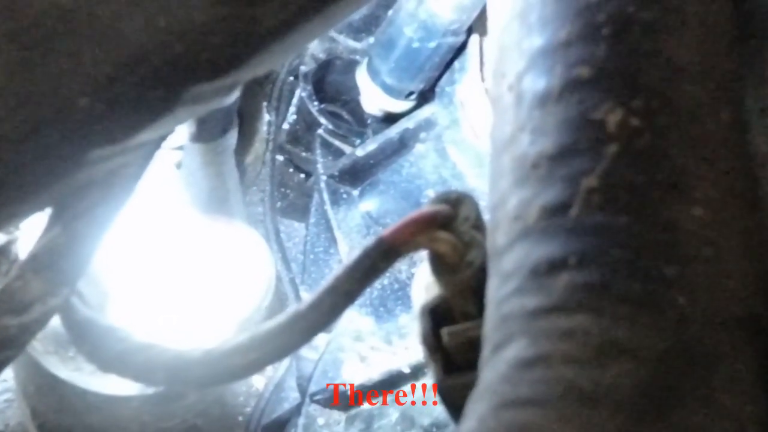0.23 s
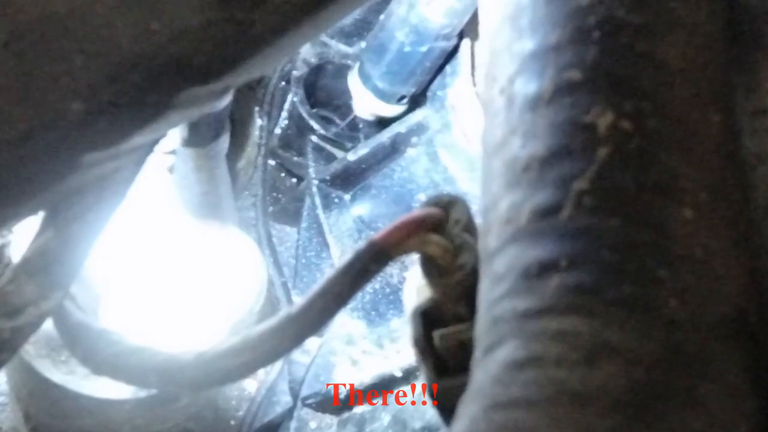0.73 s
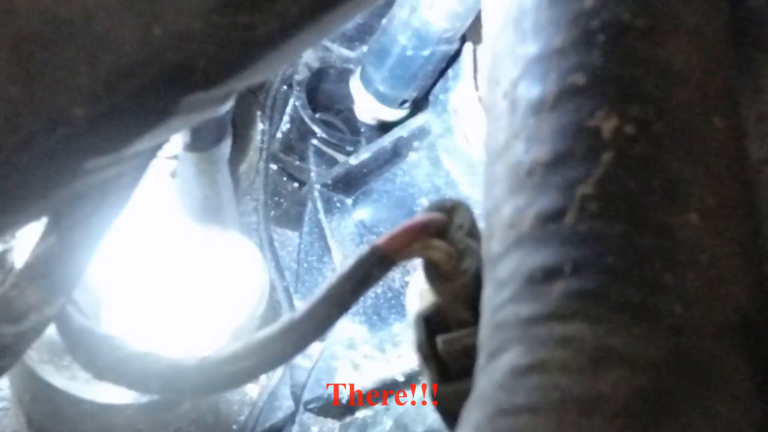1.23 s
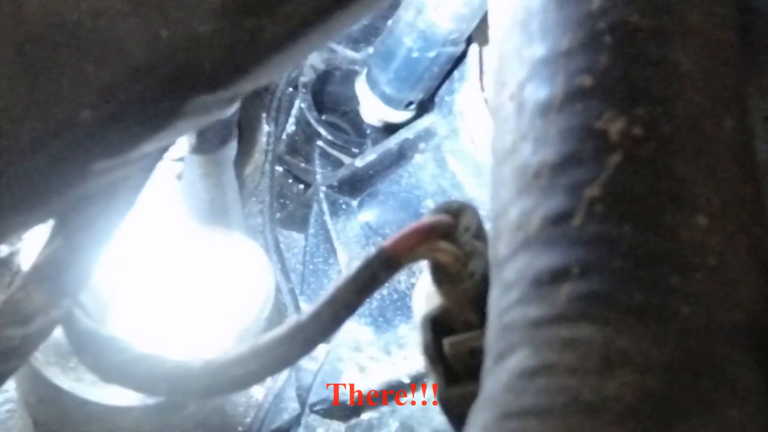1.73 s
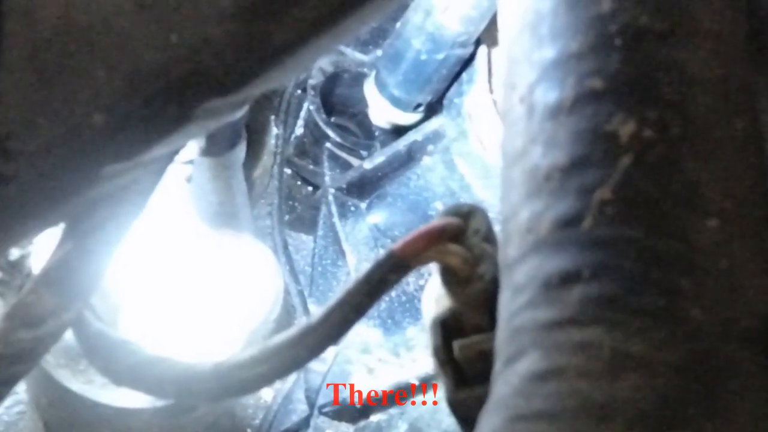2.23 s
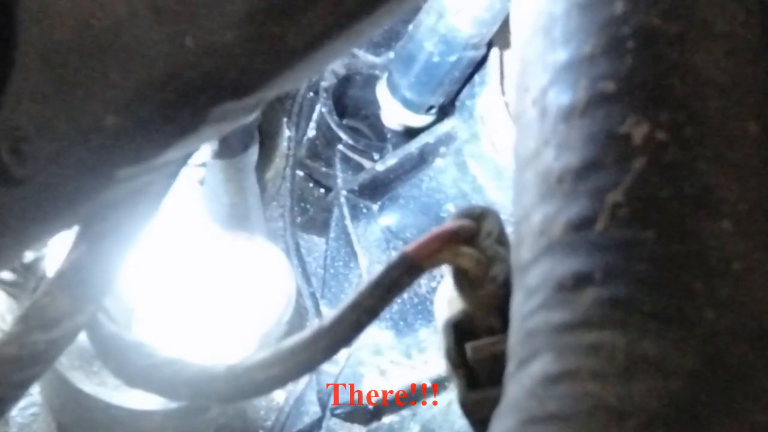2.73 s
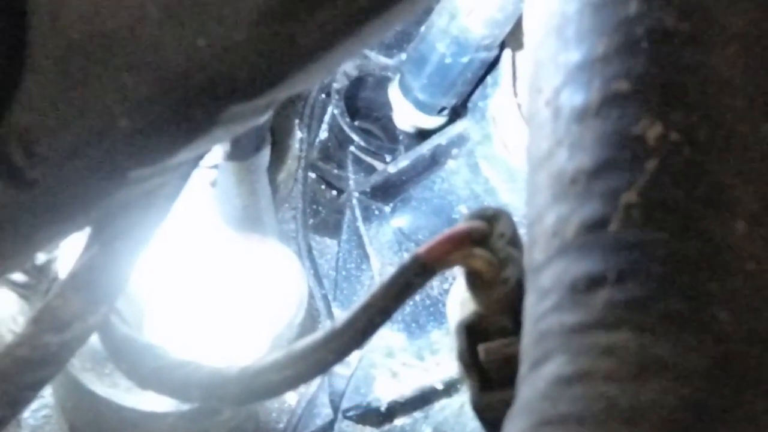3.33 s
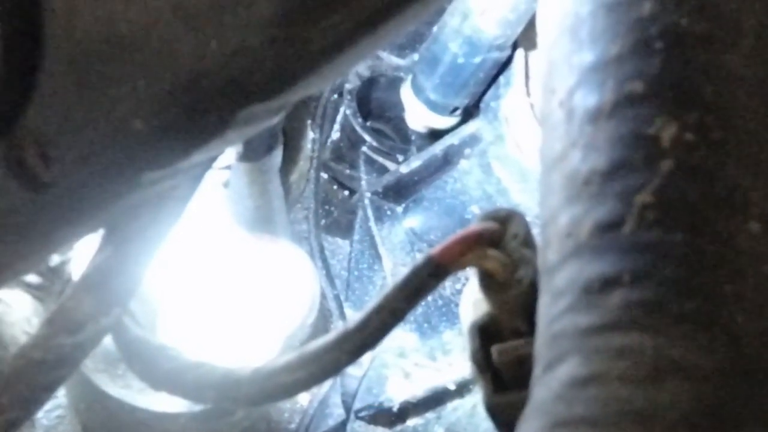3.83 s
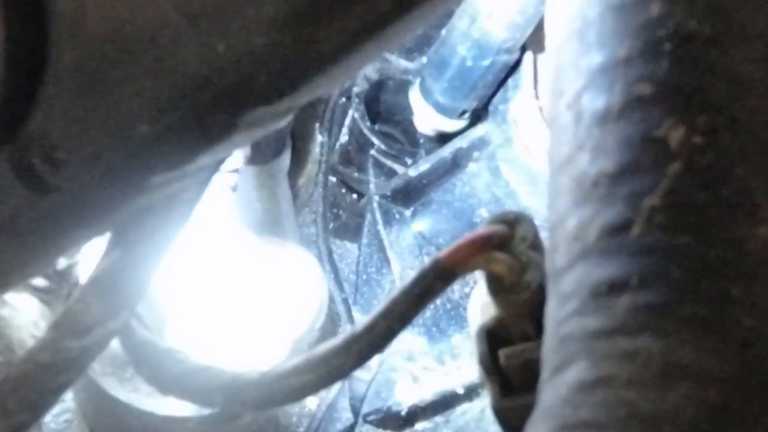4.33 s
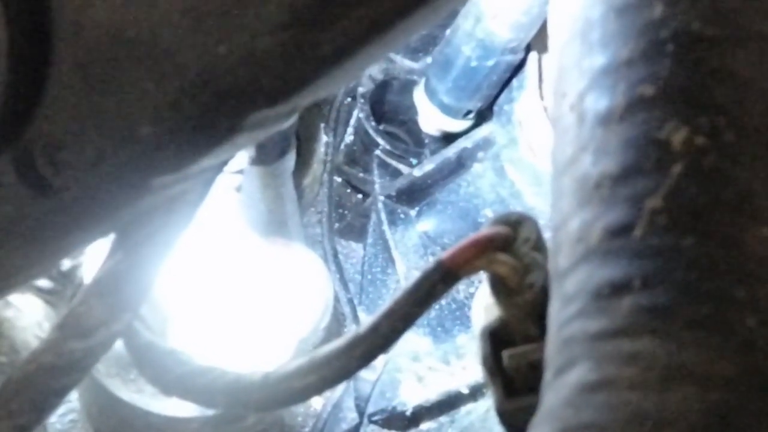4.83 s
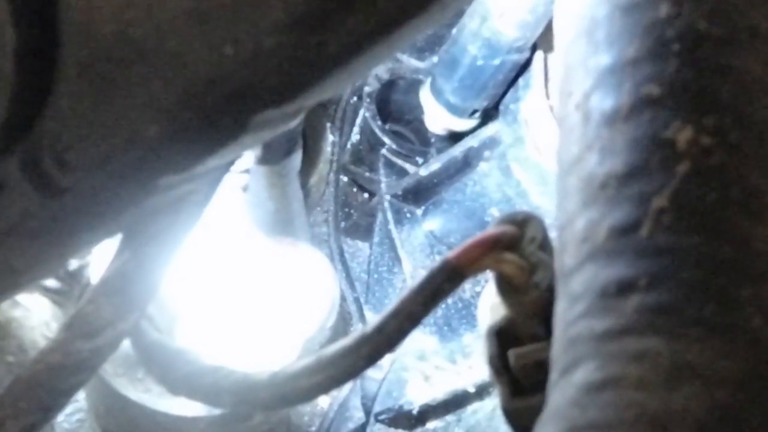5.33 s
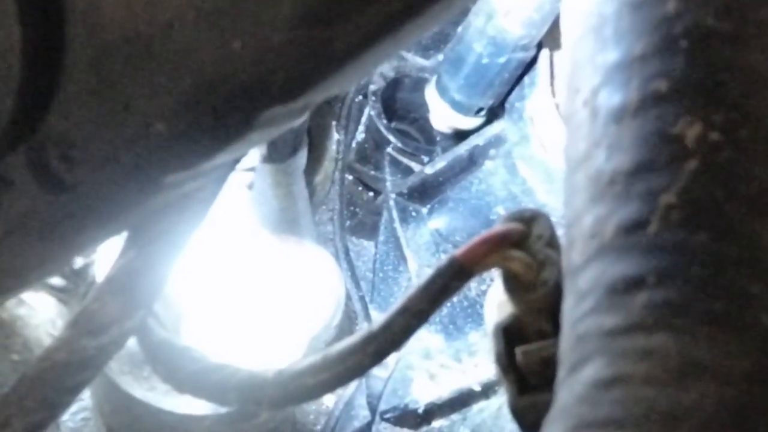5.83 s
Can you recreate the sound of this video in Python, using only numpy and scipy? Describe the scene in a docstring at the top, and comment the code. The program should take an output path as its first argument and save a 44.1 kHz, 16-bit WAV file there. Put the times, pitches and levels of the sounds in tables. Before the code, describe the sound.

A fuel pump hums low and steady in an engine bay while a finger on the right microphone pops, thumps and scrapes loudly.

```python
"""An electric fuel pump hums at one steady pitch in an engine bay, built from sines that waver a little.
A finger rests on the right microphone port of a small hand-held stereo camera. Its sticking and slipping
skin pops (filtered steps), thuds (ringing noise) and scrapes (dense clicks), now and then into overload.
It rumbles and rustles too, and a tap rings the shell. A faint whirr of narrow noise comes and goes there.
The left side hears mostly the hum, the air of the bay and hiss, both made of coloured noise."""
import sys
import numpy as np
from scipy import signal
from scipy.fft import rfft, irfft
from scipy.io import wavfile

SR = 44100
rng = np.random.default_rng(int(sys.argv[2]) if len(sys.argv) > 2 else 0)


def level_to_linear(level):
    """Convert decibel levels to linear amplitude factors, elementwise."""
    exponent = np.asarray(level, float) / 20
    return 10 ** exponent


def bounce(signal):
    """Save signal as a 16-bit WAV file at the path given by the first command-line argument."""
    frames = np.transpose(np.atleast_2d(signal))
    limited = np.clip(frames, -1, 1)
    pcm = np.round(limited * 32767).astype(np.int16)
    wavfile.write(sys.argv[1], SR, pcm)


N = 268039  # length in samples


def rms_one(x):
    """Scale to rms 1."""
    return x / np.sqrt(np.mean(x ** 2) + 1e-20)


def butter(x, hz, kind, order=2):
    """Butterworth filter, which has a smooth, flat pass band."""
    return signal.sosfilt(signal.butter(order, hz, kind, fs=SR, output="sos"), x)


def resonance(x, hz, width_hz):
    """A two-pole band-pass that rings at one pitch, with gain 1 at its peak."""
    r = np.exp(-np.pi * width_hz / SR)
    feedback = [1, -2 * r * np.cos(2 * np.pi * hz / SR), r * r]
    return signal.lfilter([(1 - r * r) / 2, 0, (r * r - 1) / 2], feedback, x)


def drift(rate_hz):
    """Slow random wandering with spread 1: noise smoothed twice, after a second to settle."""
    r = np.exp(-2 * np.pi * rate_hz / SR)
    smooth = signal.lfilter([1], [1, -2 * r, r * r], rng.standard_normal(N + SR))
    return rms_one(smooth[SR:])


def grains(shape, per_s, spread_db):
    """Random clicks of very unequal size, over a trace of noise."""
    size_db = spread_db * np.minimum(rng.exponential(1, shape), 4)
    clicks = level_to_linear(size_db) * rng.choice([-1, 1], shape)
    return clicks * (rng.random(shape) < per_s / SR) + 1e-9 * rng.standard_normal(shape)


def add(out, at, x):
    """Mix a short sound in, starting at a sample."""
    skip = max(-at, 0)
    x = x[skip:N - at]
    out[at + skip:at + skip + len(x)] += x


def swells(rows, sounds, levels_db):
    """Lay each short sound under a bell-shaped swell, centred on its time, at its rms level."""
    out, size = np.zeros(N), sounds.shape[1]
    t = (np.arange(size) - size / 2) / SR
    for row, sound, level_db in zip(rows, sounds, levels_db):
        middle_s, width_s = row[0], max(row[1], 0.004)
        swell = 2.0 ** (-(2 * t / width_s) ** 2)  # the width is taken at half height
        gain = level_to_linear(level_db) * np.sqrt(np.sum(swell ** 2) / np.sum((sound * swell) ** 2))
        add(out, round(middle_s * SR) - size // 2, gain * swell * sound)
    return out


# Tones of the pump motor on the left side.
# Each row: pitch in Hz, middle level in dB rms.
PUMP_TONES = [(256.1, -46.3), (57, -76), (361, -65), (385, -65), (479, -70), (1919, -78)]


def pump():
    """Clean motor tones whose level and phase waver a little."""
    right_db = -3
    t, out = np.arange(N) / SR, 0
    for hz, level_db in PUMP_TONES:
        level = np.sqrt(2) * level_to_linear(level_db + 1.1 * drift(4))
        out = out + level * np.sin(2 * np.pi * hz * t + 0.25 * drift(3))
    return out * level_to_linear(np.array([[0], [right_db]]))


# Skin snapping free of the port, the clear snaps.
# Each row: start in seconds, peak in dB, sharpness in Hz, peak of the tick in dB.
SNAPS = [(0.015, -11, 200, -28), (0.1272, -3, 200, -45), (0.1948, -7, 200, -38), (0.2102, -11, 200, -33),
         (0.2261, 10, 336, -8), (0.2383, -8.5, 200, -34), (0.273, -14.5, 700, -28), (0.312, -4, 450, -13),
         (0.3273, -6, 450, -22), (0.3505, -11, 300, -26), (0.366, 4, 466, -22), (0.371, -9, 300, -28),
         (0.4054, 1.5, 450, -15), (0.4188, -11, 200, -28), (0.4278, -5.5, 200, -12),
         (0.5167, -15, 700, -31), (0.529, -12, 300, -36), (0.5374, -18.5, 700, -23),
         (1.1298, -10.5, 300, -32.5), (1.1415, -14.5, 700, -30), (1.1963, -22, 200, -26.5),
         (1.2478, -10, 464, -14), (1.5489, -10, 208, -8.5), (1.6193, -17.5, 200, -25),
         (1.7161, -15, 200, -21.5), (1.7277, -15, 200, -44), (1.9166, -13, 200, -26),
         (1.9257, -11, 200, -22), (1.9519, -16, 200, -31), (2.0791, -10, 300, -34),
         (2.1387, -16.5, 198, -46), (2.2907, 7.5, 302, -19), (2.2987, -1, 300, -17),
         (2.3493, 3.5, 300, -22.5), (2.3558, 5, 443, -20), (2.3707, -11.5, 450, -38),
         (2.421, -21, 200, -50), (2.4715, -22, 200, -50), (2.516, -18, 200, -32), (2.5327, -20.5, 200, -50),
         (2.6134, -14, 300, -28.5), (2.7065, -10.5, 200, -34.5), (2.724, 7, 190, -42),
         (2.8029, -16.5, 200, -41), (2.862, -15, 193, -57), (3.1604, -19, 450, -35),
         (3.2303, -7, 199, -25.5), (3.2654, -14, 200, -42.5), (3.5948, -16.5, 700, -34),
         (3.6089, -4.5, 430, -24), (3.6499, -5.5, 198, -22.5), (3.6678, -7.5, 200, -47),
         (3.6815, -3.5, 200, -26), (3.6979, -4, 450, -26.5), (3.7296, -16.5, 200, -26),
         (3.7643, -15, 200, -26), (3.9046, -17.5, 450, -45), (4.7347, -15, 200, -35),
         (4.8454, -10.5, 200, -42), (4.9757, -15, 300, -30), (5.027, -0.5, 200, -12),
         (5.0518, -9.5, 450, -27), (5.188, -12.5, 700, -35), (5.237, -18.5, 450, -15.5),
         (5.3162, -13.5, 696, -46), (5.324, -12, 300, -33), (5.5864, -17, 696, -34),
         (5.6643, -14.5, 452, -28), (5.7693, -10.5, 1520, -30)]


def pops():
    """A sudden suction step, bled off by the leak, swings back through the cavity; a dry tick rides on its edge."""
    port_hz, port_q, leak_hz = 226.3, 2.24, 1740  # cavity under the finger and the leak that relieves it
    tick_decay_s = 0.00006
    w = 2 * np.pi * port_hz
    leak = signal.bilinear([1, 0], [1, 2 * np.pi * leak_hz], SR)
    cavity = signal.bilinear([1, 0, 0], [1, w / port_q, w * w], SR)
    step = signal.lfilter(*cavity, signal.lfilter(*leak, -np.ones(1500)))
    snaps = SNAPS + slips()
    out, crackle = np.zeros(N), rng.standard_normal((len(snaps), 60))
    fade = np.exp(-np.arange(60) / SR / tick_decay_s)
    for (s, peak_db, sharp_hz, tick_db), noise in zip(snaps, crackle):
        r = np.exp(-2 * np.pi * sharp_hz / SR)
        # the drier the snap, the steeper its edge
        edge_hz = np.clip(5500 * level_to_linear(2.05 * (tick_db - peak_db + 21.5)), 1500, 9000)
        pop = butter(signal.lfilter([1 - r], [1, -r], step), edge_hz, "low")
        tick = butter(noise * fade, [2800, 12500], "band")
        add(out, round(s * SR), level_to_linear(peak_db) * pop / -pop.min())
        add(out, round(s * SR), level_to_linear(tick_db) * tick / abs(tick).max())
    return out


def slips():
    """Each scrape also sheds one small snap at a random moment near its middle, as rows like the clear snaps."""
    s, width_s, _, grit_db = np.array(SCRAPES).T
    when, size, edge = rng.standard_normal((len(s), 3)).T
    peak_db = grit_db + 23.5 + 1.5 * size
    sharp_hz = 254 * level_to_linear(3.5 * edge)
    return list(zip(np.abs(s + 0.3 * width_s * when), peak_db, sharp_hz, peak_db - 21.5))


# The finger pumping the air in the cavity.
# Each row: middle in seconds, width in seconds, level in dB rms.
THUDS = [(0.03, 0.017, -23), (0.094, .012, -13.5), (0.116, .011, -7.5), (0.186, 0.0071, -16.5),
         (0.206, .014, -7), (0.231, .011, -14.5), (0.317, .009, -16.5), (0.35, 0.032, -22),
         (0.411, 0.016, -12.5), (0.429, 0.016, -15.5), (0.98, 0.017, -24.5), (1.705, .014, -22.5),
         (1.88, 0.024, -26), (2.237, 0.0092, -24), (2.278, 0.027, -18.5), (2.295, 0.0094, -4.5),
         (2.359, .037, -20), (2.488, 0.027, -23.5), (2.613, 0.02, -16.5), (2.632, 0.0063, -15.5),
         (2.726, 0.029, -17.5), (3.68, 0.012, -9), (3.699, 0.018, -15), (3.754, 0.021, -18),
         (3.779, 0.01, -9), (3.793, 0.017, -17), (3.905, 0.015, -18.5), (3.991, 0.031, -10.5),
         (4.086, 0.024, -13), (4.11, 0.022, -23), (4.311, .016, -8.5), (4.333, .02, -15.5),
         (4.485, 0.028, -19), (4.735, 0.032, -20.5), (4.843, 0.03, -22), (4.889, 0.04, -24.5),
         (4.941, 0.018, -27), (4.969, .019, -18.5), (5.022, 0.015, -13.5), (5.127, 0.032, -24.5),
         (5.169, 0.017, -18.5), (5.19, 0.037, -21.5), (5.224, 0.012, -23), (5.948, 0.017, -23.5)]


def thuds():
    """Noise rings in the cavity, near the pitch that the resting finger gives it at that time."""
    noises = rng.standard_normal((len(THUDS), 4097))
    rest = np.array(FINGER_REST)
    middle_s, _, level_db = np.array(THUDS).T
    scatter = 1 + 0.048 * noises[:, 0]  # pitch differs from thud to thud
    pitches_hz = np.interp(middle_s, rest[:, 0], rest[:, 3]) * scatter
    thud = np.array([resonance(noise, hz, 63) for noise, hz in zip(noises[:, 1:], pitches_hz)])
    thud = butter(butter(thud, 72, "high"), 465, "low", order=4)
    return swells(THUDS, thud, level_db)


# Skin dragging over the shell.
# Each row: middle in seconds, width in seconds, level of the body in dB rms, level of the grit in dB rms.
# The body is shared between the rub itself and the ringing shell.
SCRAPES = [(0.019, 0.032, -25.5, -40), (0.108, 0.031, -26.5, -33.5), (0.193, 0.021, -29, -37),
           (0.224, 0.024, -18, -35), (0.314, 0.044, -23, -35.5), (0.408, .045, -28.5, -30),
           (0.542, .026, -39, -51), (0.63, 0.029, -39.5, -47.5), (1.14, 0.015, -36.5, -51),
           (1.335, 0.031, -38.5, -47.5), (1.71, 0.024, -41, -43), (1.85, 0.054, -41, -51),
           (1.939, 0.027, -37, -42.5), (2.163, 0.0077, -45, -48.5), (2.259, 0.024, -35.5, -46),
           (2.292, 0.0084, -27, -47), (2.357, 0.02, -38, -32.5), (2.479, 0.032, -40, -53),
           (2.63, .018, -28.5, -44.5), (2.724, 0.043, -29, -42.5), (3.262, 0.031, -37, -52),
           (3.354, 0.046, -47, -47.5), (3.458, 0.025, -54, -47.5), (3.607, 0.031, -34, -49.5),
           (3.679, 0.058, -25, -40.5), (3.765, 0.042, -28, -43.5), (3.861, 0.011, -28, -50),
           (3.9, 0.029, -33.5, -49.5), (3.965, .028, -21, -51.5), (4.01, .025, -35, -46.5),
           (4.088, 0.029, -26, -46.5), (4.291, 0.0088, -27.5, -49), (4.308, 0.0094, -16.5, -35),
           (4.488, 0.04, -30.5, -45), (4.614, .013, -33.5, -47), (4.722, 0.031, -28.5, -42.5),
           (4.855, 0.079, -31.5, -44.5), (4.957, 0.036, -31.5, -39.5), (5.043, 0.043, -30.5, -44.5),
           (5.178, 0.038, -27, -45), (5.233, 0.019, -34.5, -47), (5.322, 0.025, -31, -46.5),
           (5.669, 0.026, -34, -45), (5.984, 0.021, -34.5, -49)]


def scrapes():
    """Dense grains of sticking skin; the duller scrapes set the shell ringing more."""
    grit = grains((len(SCRAPES), 4096), 1100, 4.6)
    body_db, grit_db = np.array(SCRAPES)[:, 2:].T
    ringing = np.clip((body_db - grit_db - 9.5) / 7, 0.02, 0.98)  # share of the body's power
    body = butter(grit, [430, 1000], "band")
    dust = butter(butter(grit, 1020, "high"), 1640, "low")
    rung = butter(housing(grit), 1050, "low", order=4)
    rubbed = swells(SCRAPES, body, body_db + 10 * np.log10(1 - ringing))
    rubbed = rubbed + swells(SCRAPES, dust, grit_db)
    shell = swells(SCRAPES, rung, body_db + 10 * np.log10(ringing))
    return rubbed, shell


# The finger lying on the port, gliding from row to row.
# Each row: time in seconds, rumble in dB, rustle in dB, pitch in Hz around which the thuds ring.
FINGER_REST = [(0.0, -34.5, -41.5, 241), (0.29, -27, -40, 239), (0.59, -36, -65, 220),
               (3.67, -34, -65, 238), (3.81, -30, -51, 185), (4.18, -32, -59, 187), (4.8, -34, -54, 224.6),
               (6.08, -41.5, -52.5, 213)]


def pressing():
    """Tremor of the resting finger: lumpy rumble in the cavity and a clumped rustle above it."""
    s, rumble_db, rustle_db, _ = np.array(FINGER_REST).T
    t = np.arange(N) / SR
    lumps = drift(23.4)
    noise = rng.standard_normal(N)
    rumble = resonance(noise, 161, 92) + level_to_linear(-41) * butter(noise, 90, "low")
    rumble = butter(rumble, 354, "low", order=4)
    rustle = butter(butter(grains(N, 500, 2.0), 250, "high"), 470, "low", order=1)
    rumble = level_to_linear(np.interp(t, s, rumble_db)) * rms_one(level_to_linear(2.6 * lumps) * rumble)
    rustle = level_to_linear(np.interp(t, s, rustle_db)) * rms_one(level_to_linear(8.6 * lumps) * rustle)
    return rumble + rustle


# A hard tap on the housing.
# Each row: start in seconds, strength in dB of the blow before the shell rings.
TAPS = [(4.3091, 1.5)]


def taps():
    """A single-sample blow rings the shell, and a low-pass softens its edge."""
    blows = np.zeros(N) + 1e-18
    for s, strength_db in TAPS:
        blows[round(s * SR)] = -level_to_linear(strength_db)
    return butter(housing(blows), 2260, "low", order=4)


# Ringing modes of the plastic shell.
# Each row: pitch in Hz, relative level in dB, time in seconds to die away by 60 dB.
SHELL_MODES = [(690, 0, .034), (867, -2, .032), (1222, -16, .023), (1750, -26, .06), (2420, -11, .012)]


def housing(x):
    """The plastic shell rings briefly in its modes."""
    out = 0
    for hz, level_db, t60_s in SHELL_MODES:
        r, w = level_to_linear(-60 / (t60_s * SR)), 2 * np.pi * hz / SR
        out = out + signal.lfilter([0, level_to_linear(level_db) * np.sin(w)], [1, -2 * r * np.cos(w), r * r], x)
    return out


# Spells of a faint throbbing whirr on the right.
# Each row: start in seconds, end in seconds, level in dB added to the whirr's resting level.
WHIRR_SPELLS = [(0.57, .82, -63), (1.62, 2.164, -63), (2.916, 3.48, -62), (4.233, 4.567, -63),
                (5.87, 6.1, -65)]


def whirr():
    """Narrow throbbing noise, very faint throughout and raised for short spells."""
    pitch_hz, width_hz, throb_hz, rest_db, ramp_s = 5540, 210, 34, -72, 0.019
    t, level = np.arange(N) / SR, np.zeros(N) + level_to_linear(rest_db)
    for start, end, level_db in WHIRR_SPELLS:
        level += level_to_linear(level_db) * np.clip(np.minimum(t - start, end - t) / ramp_s, 0, 1)
    tone = resonance(rng.standard_normal(N), pitch_hz, width_hz)
    tone = resonance(tone, pitch_hz, width_hz)
    throb = 1 + 0.21 * np.sin(2 * np.pi * throb_hz * t + 0.4 * drift(5))
    return level * rms_one(tone * throb)


# Bay noise and hiss, before the casing bands, the shading and the flicker.
# Each row: frequency in Hz, level in dB per Hz.
AIR_COLOUR = [(30, -101), (55, -84), (80, -89), (130, -81), (190, -78), (280, -73), (400, -79), (600, -84),
              (850, -87), (1250, -90.5), (1750, -93), (2600, -96), (5000, -98), (15000, -100)]
# Noise of the pump casing.
# Each row: middle in Hz, width in Hz, lift in dB above the air.
CASING_BANDS = [(860, 90, 4), (1670, 130, 5.5), (2270, 100, 2.5)]


def air():
    """Steady coloured noise with a few casing bands; the top hiss is largely shared by both sides and flickers."""
    alike_above_hz, hiss_top_hz, muffle_db = 5650, 15300, -5
    hz = np.maximum(np.fft.rfftfreq(N, 1 / SR), 1)
    left, right = rfft(rng.standard_normal((2, N)))
    colour_hz, level_db = np.array(AIR_COLOUR).T
    colour_db = np.interp(np.log(hz), np.log(colour_hz), level_db)
    for centre_hz, width_hz, lift_db in CASING_BANDS:
        colour_db = colour_db + lift_db * np.exp(-0.5 * ((hz - centre_hz) / width_hz) ** 2)
    colour = level_to_linear(colour_db) * np.sqrt(SR / 2)
    # the finger shades the right port from the middle of the bay noise
    shade = level_to_linear(muffle_db * np.exp(-0.5 * (np.log2(hz / 1400) / 0.5) ** 2))
    low = irfft(np.array([left, shade * right]) * colour * (hz < alike_above_hz), N)
    top = np.array([left, 0.85 * left + 0.53 * right])
    top = top * (hz >= alike_above_hz) * (hz < hiss_top_hz)
    flicker = level_to_linear(0.64 * drift(2.2))
    return low + flicker * irfft(top * colour, N)


def scene():
    """Hum and air reach both ports; the finger sounds on the right, and only the shell carries a little across."""
    shell_left_db = -50
    thumped = thuds()
    rubbed, shell = scrapes()
    shell = shell + taps()
    right = pops() + thumped + rubbed + pressing() + shell + whirr()
    return pump() + air() + np.array([level_to_linear(shell_left_db) * shell, right])


def low_pass(x):
    """Removes everything above the highest recorded frequency."""
    return signal.sosfilt(signal.butter(12, 16470, fs=SR, output="sos"), x)


def record(dry):
    """The input overloads hard on the loudest pops."""
    clip_top = 0.97  # of full scale
    mix = np.clip(dry, -clip_top, clip_top)
    return low_pass(mix)


dry = scene()
out = record(dry)
bounce(out)
```